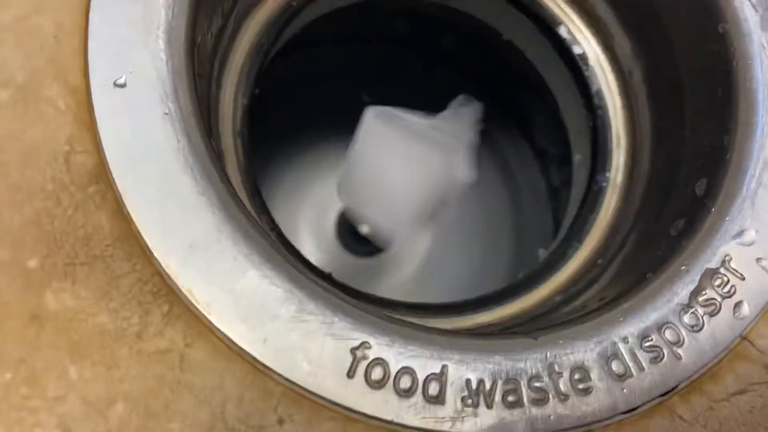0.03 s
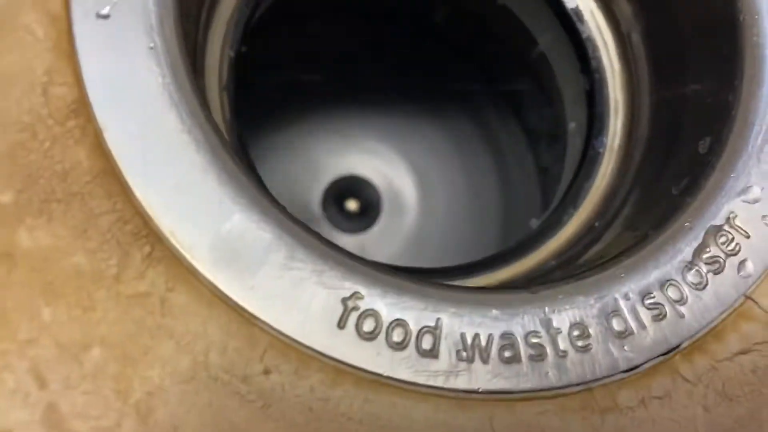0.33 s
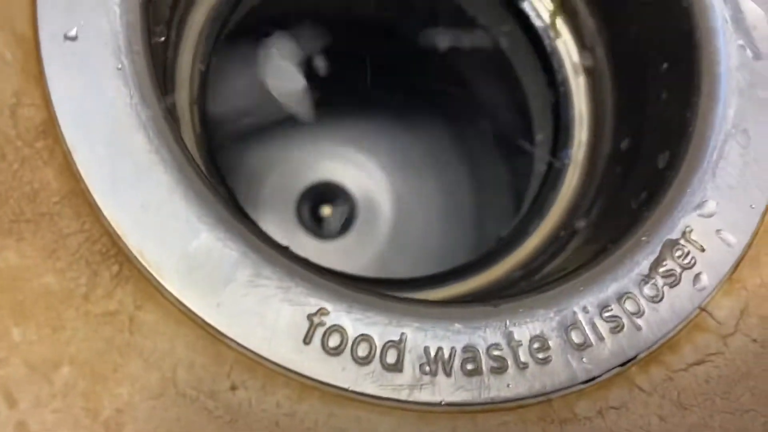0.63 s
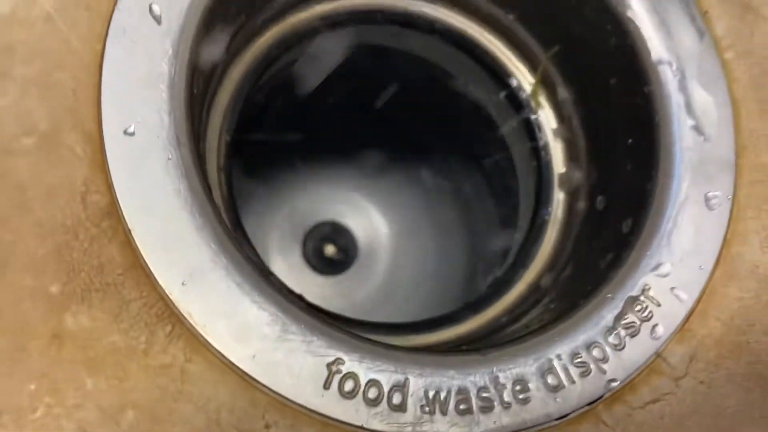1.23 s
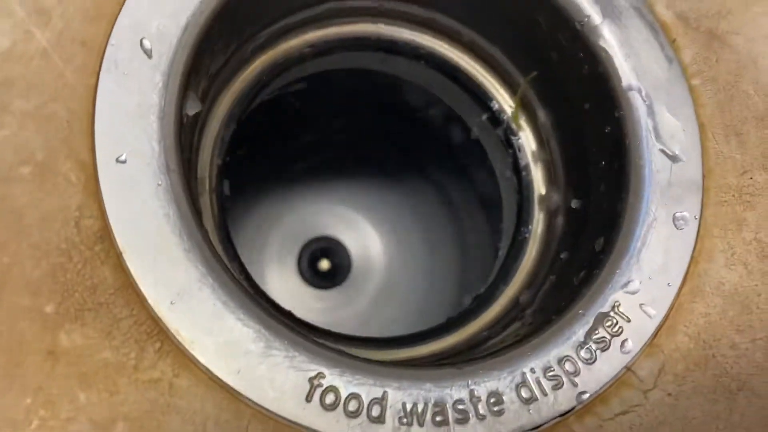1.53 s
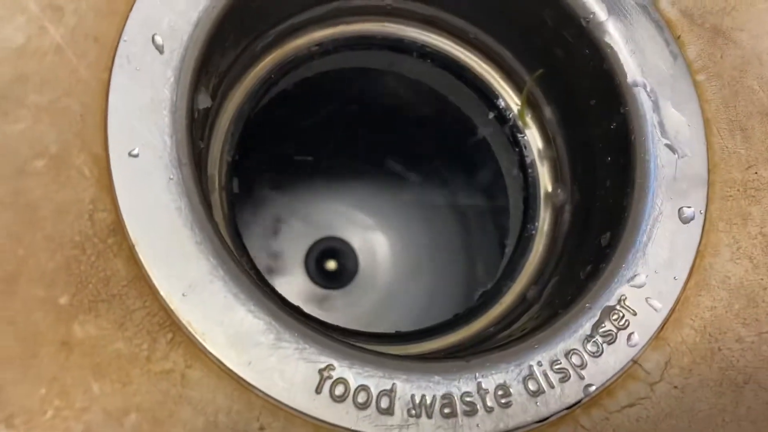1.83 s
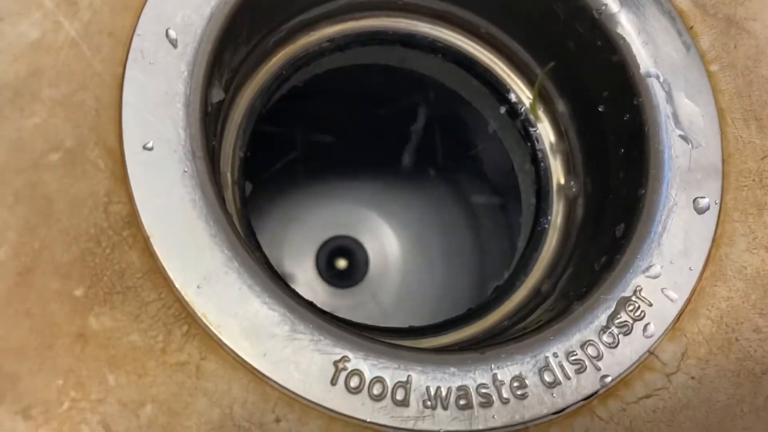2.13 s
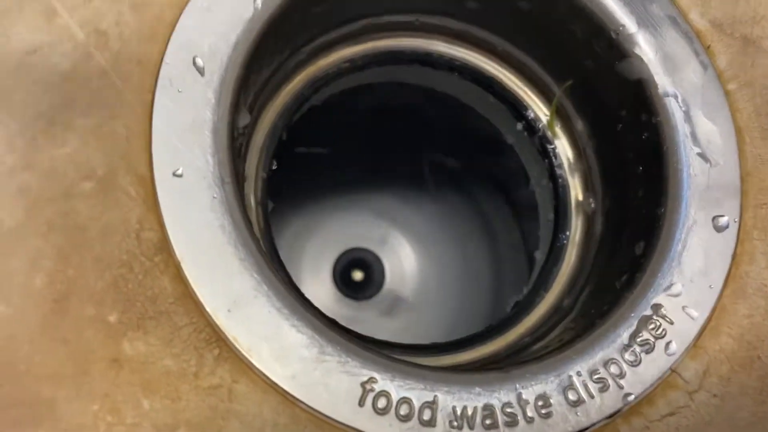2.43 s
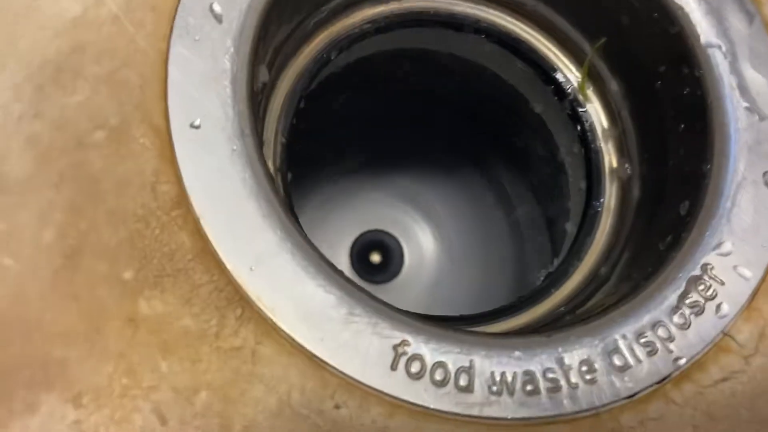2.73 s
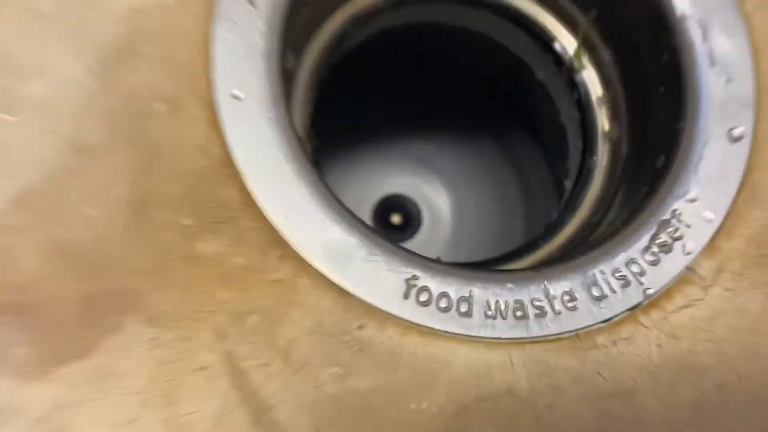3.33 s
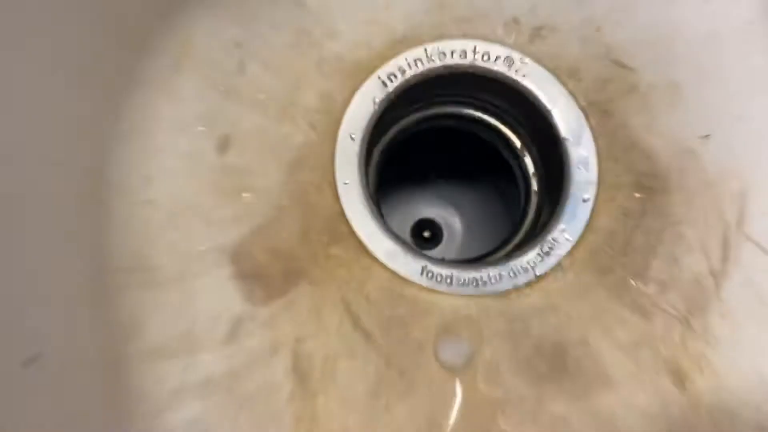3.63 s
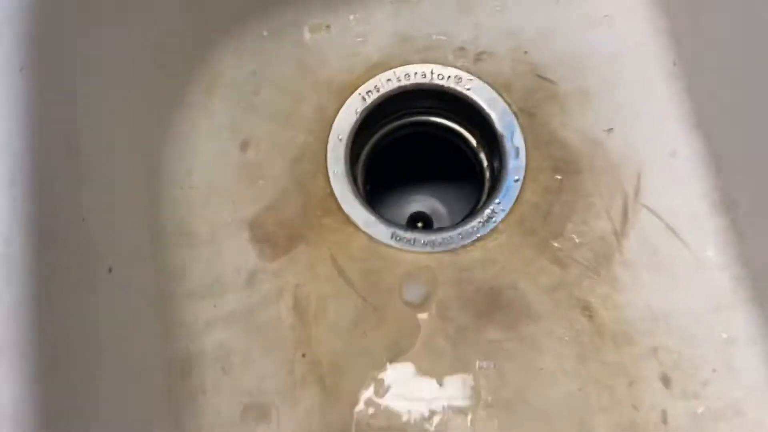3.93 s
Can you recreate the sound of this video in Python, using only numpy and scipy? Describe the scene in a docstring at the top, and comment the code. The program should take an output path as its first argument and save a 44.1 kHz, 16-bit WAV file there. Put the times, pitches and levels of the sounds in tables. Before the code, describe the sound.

A garbage disposal grinds ice, heard just above a kitchen sink drain. From 0.1 to 0.8 seconds, loud cracks and thumps hit over the motor's hum and whir. Chips rattle and clink in the ringing steel chamber, with scattered weaker hits until about 2.3 seconds, wearing down to hissing slush beside a thin whistle. From about 3.3 seconds the microphone draws back: the whir softens and faint whines emerge.

```python
"""At a kitchen sink, just above the drain, a disposal grinds ice. Its motor hums, rushes and whines,
and its spinning plate gives a thin whistle. A cube is smashed in a few loud blows that thump the
housing. The chips rattle round the ringing steel chamber and wear down to a hissing spray of slush.
Near the end the microphone draws back: the sink's echo fades and the motor's whines stand out."""
import sys
import numpy as np
from scipy import signal
from scipy.fft import rfft, irfft, next_fast_len
from scipy.io import wavfile
from scipy.ndimage import map_coordinates

SR = 44100
rng = np.random.default_rng(int(sys.argv[2]) if len(sys.argv) > 2 else 0)


def transcribe(signal):
    """Save signal, clipped to [-1, 1], as a 16-bit WAV file at the path in sys.argv[1]."""
    frames = np.atleast_2d(signal).T
    limited = np.clip(frames, -1, 1)
    pcm = np.round(limited * 32767).astype(np.int16)
    wavfile.write(sys.argv[1], SR, pcm)


N = 176400  # 4 seconds
TOP_HZ = 15800  # the highest frequency kept

# The impeller (the spinning part) hitting ice. Each row: start in seconds, relative level in dB,
# relative brightness in dB, pitch of the struck piece in Hz.
ICE_HITS = [(0.0807, -11.5, -10.5, 2470), (0.0886, -15, -4, 5200), (0.0974, -5.5, -11, 3900),
            (0.1029, -13.5, -12, 2800), (0.111, -12, -15, 4210), (0.1179, -18, -13, 4080),
            (0.158, -16, -5.5, 4140), (0.1658, -4.5, -33, 3850), (0.1794, -10, -12, 2230),
            (0.2092, -18, -7, 2640), (0.231, -11.5, -24, 4600), (0.2487, -14, 1.5, 4160),
            (0.2508, -7.5, -31, 2620), (0.2855, -14.5, -11, 4840), (0.3045, -4.5, -11.5, 1712),
            (0.3121, -14.5, -3, 4230), (0.319, -6.5, -12, 4000), (0.3456, -15, -18, 4100),
            (0.405, -10.5, -5, 2305), (0.409, -4.5, -12.5, 4226), (0.412, -11, -4, 1730),
            (0.417, -12, -12.5, 5100), (0.451, -13.5, -14, 3840), (0.462, -5, -14.5, 4270),
            (0.467, -18, 1, 4440), (0.4754, -16, -3, 3550), (0.507, -19, -5, 2530),
            (0.5346, -17, -12, 4380), (0.542, -16.5, -18, 4400), (0.5524, -20.5, -10, 4130),
            (0.623, -12, -13, 4100), (0.6619, -14, -4.5, 4100), (0.6821, -14, -4, 4080),
            (0.689, -19, -16, 4100), (0.749, -13.5, -5, 4270), (0.757, -18, -11, 4040),
            (0.7706, -18, -4, 4360), (0.9088, -15.5, -15, 4060), (0.962, -15.5, -9, 3680),
            (1.101, -24.5, 2.5, 2440), (1.2194, -34, 13.5, 4580), (1.2858, -16.5, -3, 4230),
            (1.3983, -32, -1, 2700), (1.519, -20.5, -7, 2904), (1.5679, -17.5, -12, 4130),
            (1.7863, -19.5, 2, 4380), (1.793, -27, 1, 4740), (1.9031, -23, -2, 4310),
            (1.979, -14, -7, 4020), (2.084, -14, -19, 4210), (2.083, -15.5, -20, 2986),
            (2.2415, -19.5, -5, 2910), (2.3182, -38, 12, 4400), (2.8178, -29, 10, 2340),
            (2.9703, -33.5, 10.5, 4570)]
# How hard the grinder works. Each row: time in seconds, chip rattle in dB, housing rumble in dB.
GRINDING_LEVELS = [(0,-55,-61),(.075,-55,-53),(.1,-12,-40),(.145,-47,-32),(.17,-29.5,-35),(.39,-33.5,-39),(.47,-28,-30),(.7,-31.5,-42),(1.08,-34.5,-45.5),(1.13,-28.5,-36),(1.26,-35.5,-47.5),(1.3,-31,-45.5),(1.85,-30.5,-49.5),(2.4,-35,-50.5),(3.1,-33,-51),(3.5,-42.5,-56),(4,-41.5,-62)]


def amp(db):
    """Turn decibels into a number to multiply by."""
    return 10 ** (np.asarray(db) / 20)


def fade(t, t60):
    """A fade that falls by 60 dB in t60 seconds."""
    return amp(-60 * t / t60)


def unit(x):
    """Scale a sound to an average (rms) level of 1."""
    return x / np.sqrt(np.mean(x ** 2) + 1e-20)


def along(points, hz):
    """Read between (Hz, value) points on a logarithmic frequency scale."""
    f, values = np.transpose(points)
    return np.interp(np.log(hz + 1), np.log(f + 1), values)


def curves(rows):
    """Turn rows that start with a time into one curve for each other column."""
    times, *columns = np.transpose(rows)
    return [np.interp(np.arange(N) / SR, times, column) for column in columns]


def wobble(rate):
    """A smooth curve through `rate` random values a second."""
    return map_coordinates(rng.standard_normal(2048), [np.arange(N) * rate / SR], mode="wrap")


def grid():
    """The frequencies in Hz at which filters are given."""
    return np.fft.rfftfreq(2 * next_fast_len(N // 2 + 4096), 1 / SR)


def filtered(x, response):
    """Pass a sound through a filter."""
    return irfft(rfft(x, 2 * len(response) - 2) * response)[..., :N]


def colour(points, low_hz=None):
    """A filter through (Hz, dB) points that falls steeply below low_hz."""
    hz = grid()
    low_cut = (hz ** 2 / (hz ** 2 + low_hz ** 2)) ** 2 if low_hz else 1
    cepstrum = irfft(np.log(amp(along(points, hz)) * low_cut + 1e-6))
    half = len(cepstrum) // 2
    cepstrum[1:half] *= 2  # folding makes the filter ring after a hit, never before it
    cepstrum[half + 1:] = 0
    return np.exp(rfft(cepstrum))


def add(track, start, sound):
    """Mix a sound into a track at `start` seconds."""
    part = track[..., max(0, round(start * SR)):][..., :sound.shape[-1]]
    part += sound[..., :part.shape[-1]]


def band(hz, width_hz):
    """A narrow band of noise."""
    return unit(filtered(rng.standard_normal((2, N)), 1 / (1 + 2j * (grid() - hz) / width_hz) ** 2))


def clicks(rate, spread_db):
    """Clicks of random size, about `rate` a second."""
    hits = rng.random(N) < rate / SR
    return hits * amp(spread_db * np.clip(rng.standard_normal(N), -2, 2)) * rng.choice([-1, 1], N)


def chamber(points, ring_db):
    """A filter through (Hz, dB) points with the ringing of the steel chamber added."""
    # The steel's resonances. Each row: pitch in Hz, width in Hz, relative level in dB.
    resonances = [(946,10.7,-2),(1560,49,4.5),(1675,44,-0.5),(2163,100,-0.5),(2375,18,6.5),(2620,26,8.5),(2820,140,2),(4106,39,9.5),(4300,79,7),(4690,45,7),(7210,220,-6.5)]
    f = grid()
    ring = sum(amp(db) * 1j * f * width / (hz * hz - f * f + 1j * f * width)
               for hz, width, db in resonances)
    response = colour(points, low_hz=323) * (1 + amp(ring_db) * ring) * (f < TOP_HZ)
    return response / np.sqrt(np.mean(abs(response) ** 2))


def basin(x):
    """The sink adds an echo, which comes later and fades as the microphone draws back."""
    # Each row: time in seconds, delay in milliseconds, strength as a share of the direct sound.
    echo = [(0,0.35,0.12),(3.1,0.35,0.21),(3.3,0.37,0.071),(3.5,0.48,0.059),(3.67,.59,0),(3.83,0.96,0.054),(4,.77,0.0016)]
    delay_ms, share = curves(echo)
    n = np.arange(N)
    return x + share * np.array([np.interp(n - delay_ms * SR / 1000, n, side) for side in x])


def stereo(pair, alike=1):
    """Blend two unrelated versions of a sound into a left and a right that are partly alike."""
    # Each row: frequency in Hz, likeness of the sides from 0 to 1 (before `alike` scales it).
    likeness = [(300,0.84),(600,0.083),(1600,0.09),(3000,0.32),(5000,0.083),(7000,0.82),(8000,1),(9000,1),(10200,0.95),(11500,0.78),(12500,0.89),(13700,1),(15500,0.94)]
    # Each row: frequency in Hz, how far the left wave is ahead in radians.
    left_lead = [(400,0),(1000,0),(1400,3),(1900,3.3),(2500,6.28),(3100,9.3),(3800,10.4),(4700,12.5),(5600,15.6),(6200,13.1),(7400,12.3),(8700,9.6),(9500,9.3),(10900,6.35),(11900,6.2),(13100,3.2),(14400,3.1),(14900,0)]
    f = grid()
    blend = np.arccos(np.clip(alike * along(likeness, f), 0, 1)) / 2
    lead = np.exp(.5j * along(left_lead, f))
    common, apart = rfft(pair, 2 * len(f) - 2) * [np.cos(blend), np.sin(blend)]
    return irfft(np.array([(common + apart) * lead, (common - apart) / lead]))[:, :N]


def whines():
    """Faint, airy whines of the motor, clearer from farther back."""
    # Each row: pitch in Hz, width in Hz, starting point for the level in dB.
    bands = [(1275,54,-59),(2640,56,-54.5),(3760,490,-50),(4570,210,-52)]
    # Each row: time in seconds, dB added to all the bands.
    boost = [(0,-8.5),(3.15,-4),(3.5,5.5),(3.85,0),(4,4.5)]
    return amp(curves(boost)[0]) * sum(amp(db) * band(hz, width) for hz, width, db in bands)


def whistle():
    """The spinning plate's thin tone, with air ringing in the chamber around it."""
    # Each row: time in seconds, relative level in dB.
    levels = [(0,-49.5),(1.2,-61.5),(1.4,-47),(1.9,-47.5),(2.6,-48.5),(3.3,-53.5),(3.55,-51),(4,-55)]
    pitch_hz = 861 + 2.08 * wobble(29.76)
    gain = np.sqrt(2) * amp(curves(levels)[0] + .6 * wobble(26))
    tone = gain * np.sin(2 * np.pi * np.cumsum(pitch_hz) / SR)
    air = amp(-55) * band(865, width_hz=90)[0]
    return (tone + air) * amp([[4], [-8]])  # louder on the left


def whir():
    """The rush of the motor and the air that it stirs."""
    # Each row: frequency in Hz, relative level in dB.
    tone = [(25,-28),(60,-1),(90,-2),(170,-25),(230,16),(300,12),(400,1),(500,-5),(700,-38),(1300,-0.5),(2700,-3.5),(4200,-32),(6000,0)]
    # Each row: time in seconds, level in dB.
    levels = [(0,-47),(3.3,-46),(3.7,-55.5),(4,-55.5)]
    treble_cut = 1 / (1 + (grid() / 5500) ** 4)
    rush = filtered(rng.standard_normal((2, N)), colour(tone) * treble_cut)
    return amp(curves(levels)[0]) * unit(rush)


def hum():
    """The motor's magnetic hum at twice the mains frequency, with overtones."""
    # Each row: multiple of the hum's pitch, relative level in dB.
    harmonics = [(1,-3.5),(2,-12.5),(3,-6.5),(4,-52)]
    # Each row: time in seconds, overall level in dB.
    levels = [(0,-25.5),(.08,-25.5),(.2,-32.5),(.5,-39),(3.4,-40),(3.7,-46),(4,-48.5)]
    # The third harmonic stands out farther from the drain. Each row: time in seconds, added dB.
    third_boost = [(0,-8),(3.3,-4.5),(3.7,4.5),(4,5)]
    hum_hz, t, out = 119.95, np.arange(N) / SR, np.zeros(N)
    (level_db,), (boost_db,) = curves(levels), curves(third_boost)
    for k, db in harmonics:
        gain = np.sqrt(2) * amp(level_db + db + (k == 3) * boost_db + .6 * wobble(2.84))
        out += gain * np.sin(2 * np.pi * (k * hum_hz * t + rng.random()))
    return out


def housing():
    """The housing booms under big lumps of ice and rumbles under small ones."""
    # The housing's own notes. Each row: pitch in Hz, relative level in dB, fade time in seconds.
    notes = [(55,-27.5,.06),(168,-4,.1),(221,0,.12),(279,-1.5,.09),(345,-3.5,.09),(425,-17,.12),(560,-21,.12)]
    # Big lumps. Each row: start in seconds, relative level in dB, pitch of the boom in Hz.
    thumps = [(.095,-8,240),(.184,-12,205),(.203,-12,222),(.249,-17,255),(.306,-12.5,238),(.407,-9.5,255),(.435,-19,225),(.46,-23.5,240),(.626,-20,228),(.683,-23,222),(.969,-23.5,245),(1.12,-29,225),(1.157,-27.5,250),(1.286,-28.5,250),(1.41,-32,235),(1.571,-21,225),(1.986,-30,265),(2.245,-31,250)]
    t, booms = np.arange(SR // 4) / SR, np.zeros(N)

    def ring(tuning):
        """The notes sound together after one jolt, each pitch multiplied by its tuning."""
        waves = sum(amp(db) * fade(t, t60) * np.sin(2 * np.pi * (hz * ratio * t + rng.random()))
                    for (hz, db, t60), ratio in zip(notes, tuning))
        return waves * (1 - np.exp(-t / .0024))

    swell = (1 - np.exp(-(t / .006) ** 2)) * fade(t, t60=.095)
    for start, db, hz in thumps:
        ringing = amp(-8) * ring(1 + .023 * rng.standard_normal(len(notes)))
        add(booms, start, amp(db) * (swell * np.sin(2 * np.pi * hz * t) + ringing))
    in_tune = np.ones(len(notes))
    common, apart = (unit(signal.oaconvolve(clicks(rate=76, spread_db=4), ring(in_tune))[:N])
                     for _ in range(2))
    rumble = common + amp(-26) * np.array([apart, -apart])  # nearly the same on both sides
    return booms + amp(curves(GRINDING_LEVELS)[1]) * rumble


def patter(rate, spread_db, t60, spots=8):
    """Small hits on several spots of the wall, each spot with its own short ring."""
    t, out = np.arange(SR // 20) / SR, np.zeros((2, N))
    for _ in range(spots):
        hits = clicks(rate / spots, spread_db)
        ring = rng.standard_normal((2, len(t))) * fade(t, t60)
        out += signal.oaconvolve(hits[None], ring, axes=1)[:, :N]
    return out


def shard(hz, t60):
    """One piece of ice rings with five close pitches that swell quickly and die away."""
    t = np.arange(SR // 12) / SR
    pitches = hz * np.exp(.07 * rng.standard_normal((5, 1)))
    ring = rng.standard_normal((2, 5)) @ np.sin(2 * np.pi * pitches * t)
    return unit(ring) * (1 - np.exp(-t / .0012)) * fade(t, t60)


def tinkle(rate, centre_hz, spread, t60):
    """Loose pieces of ice ring at random times, pitches and strengths."""
    out = np.zeros((2, N))
    for start in np.flatnonzero(rng.random(N) < rate / SR) / SR:
        pitch, size = np.clip(rng.standard_normal(2), -1.6, 1.6)
        add(out, start, amp(3.5 * size) * shard(centre_hz * np.exp(spread * pitch), t60))
    return unit(out)


def spray():
    """Slush flung off the plate: a dense fizz with tiny ringing splinters, coming in spurts."""
    # Each row: frequency in Hz, relative level in dB.
    tone = [(450, -57), (700, -40), (1100, -4), (1400, -35), (1650, -10.5), (2700, -4.5), (4200, -4.5),
            (5500, -4.5), (7500, 1), (9400, 4), (11500, 3), (13500, 0.5), (15500, -8.5)]
    # Each row: time in seconds, level in dB.
    levels = [(0,-75),(.14,-88),(.2,-38),(.39,-33.5),(.48,-31),(.95,-27.5),(1.08,-34),(1.14,-28.5),(1.25,-37),(1.3,-28.5),(1.8,-30.5),(1.94,-34),(2.02,-30),(2.4,-34),(2.65,-28.5),(2.78,-34.5),(2.84,-32.5),(3.2,-29.5),(3.32,-26),(3.49,-27.5),(3.54,-31),(3.72,-31.5),(3.78,-34.5),(4,-33)]
    # The spray smooths out as the last ice goes. Each row: time in seconds, share of the spurts kept.
    unevenness = [(0,.8),(1.9,1),(2.4,.65),(4,.35)]
    fizz = filtered(patter(rate=3000, spread_db=6, t60=.039), chamber(tone, ring_db=-9))
    pings = amp(-4.5) * tinkle(rate=270, centre_hz=10300, spread=.16, t60=.036)
    spurts_db = 1.5 * np.tanh(wobble(24.9)) + 2.3 * np.tanh(wobble(110))
    return (unit(fizz) + pings) * amp(curves(levels)[0] + curves(unevenness)[0] * spurts_db)


def chips():
    """Chips of ice rattle against the wall and clink, growing more numerous and fainter."""
    # Each row: time in seconds, hits per second.
    hit_rates = [(0,380),(1.9,450),(2.5,1400),(4,2500)]
    # Each row: frequency in Hz, relative level in dB.
    tone = [(400, -7), (550, 6.5), (700, -19), (880, 11.5), (1050, -45.5), (1400, -9.5), (1600, 1),
            (2700, -8), (4300, -7.5), (6500, -3.5), (9300, 7.5), (11500, 6.5), (15500, -41.5)]
    # Each row: time in seconds, level of the clinks compared with the rattle in dB.
    clink_levels = [(0,-9),(.62,-1),(1.3,-8),(2.3,-16)]
    rate, = curves(hit_rates)
    hits = patter(rate, spread_db=8, t60=.049) / np.sqrt(rate)  # denser without getting louder
    rattle = unit(filtered(hits, chamber(tone, ring_db=10)))
    clinks = amp(curves(clink_levels)[0]) * tinkle(rate=110, centre_hz=4100, spread=.14, t60=.11)
    return (rattle + clinks) * amp(curves(GRINDING_LEVELS)[0])


def knock():
    """A single dull knock in the chamber."""
    # Each row: frequency in Hz, relative level in dB.
    tone = [(500,-32),(900,0),(1500,0),(2400,-5),(4000,-32)]
    t, out = np.arange(SR // 8) / SR, np.zeros((2, N))
    add(out, start=2.614, sound=amp(-29) * fade(t, t60=.06) * rng.standard_normal((2, len(t))))
    return filtered(out, chamber(tone, ring_db=-14))


def ice_rings():
    """Each piece rings at its own pitch when the impeller strikes it."""
    out = np.zeros((2, N))
    for start, db, _, hz in ICE_HITS:
        add(out, start, amp(db - 10) * shard(hz, t60=.07))
    return out


def blows():
    """Each blow is a sharp crack and a tail of flying splinters that set the chamber ringing."""
    # Each row: frequency in Hz, relative level in dB.
    tone = [(400, 11.5), (700, -13), (880, 4.5), (1000, -5.5), (1350, -13.5), (1650, 2), (2200, -8.5),
            (3300, -2), (4200, -4), (6000, 3.5), (9000, 4.5), (12000, 8), (13800, -0.5), (15500, -2)]
    t = np.arange(SR // 8) / SR
    snap, splinters = fade(t, t60=.024), amp(-4.5) * fade(t, t60=.082)
    shape = (1 - np.exp(-t / .0006)) * np.hypot(snap, splinters)
    middle, treble = np.zeros((2, 2, N))
    for start, db, bright_db, _ in ICE_HITS:
        crack = amp(db - 2) * shape * rng.standard_normal((2, len(t)))
        add(middle, start, crack)
        add(treble, start, crack * amp(bright_db + 5))
    steel = chamber(tone, ring_db=7)
    low_pass = 1 / (1 + (grid() / 5700) ** 8)  # middle and treble meet at 5700 Hz
    return filtered(middle, steel * low_pass) + filtered(treble, steel * (1 - low_pass))


def scene():
    """Mix the ice, the slush and the motor in the sink."""
    body = (housing() + hum()) * amp([[-1.03], [1.03]])  # a little louder on the right
    # The blows sound wider, less alike on the left and right.
    smash = stereo(basin(blows() + ice_rings() + knock()), alike=.6)
    grinding = stereo(basin(chips() + spray() + whir()))
    return smash + grinding + body + whistle() + whines()


def record(dry):
    """Remove everything above TOP_HZ."""
    return filtered(dry, grid() < TOP_HZ)


dry = scene()
out = record(dry)
transcribe(out)
```